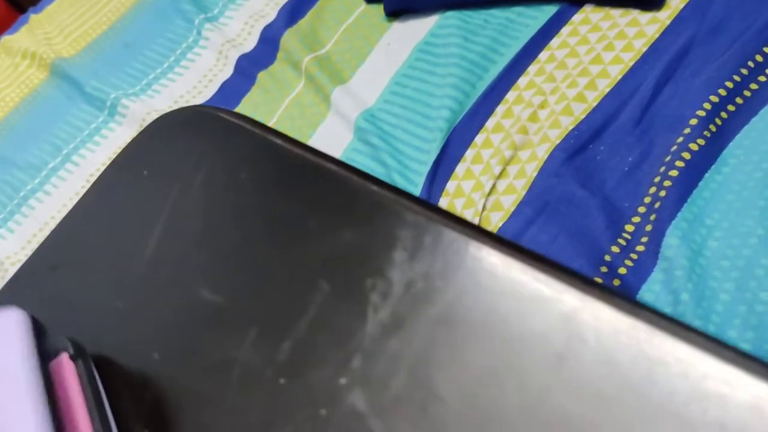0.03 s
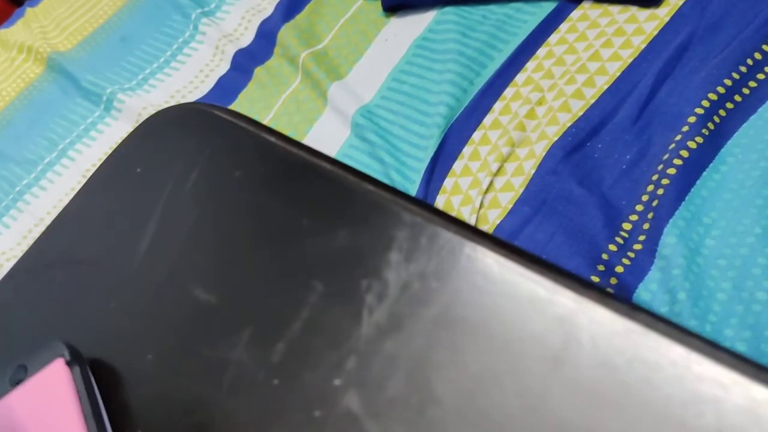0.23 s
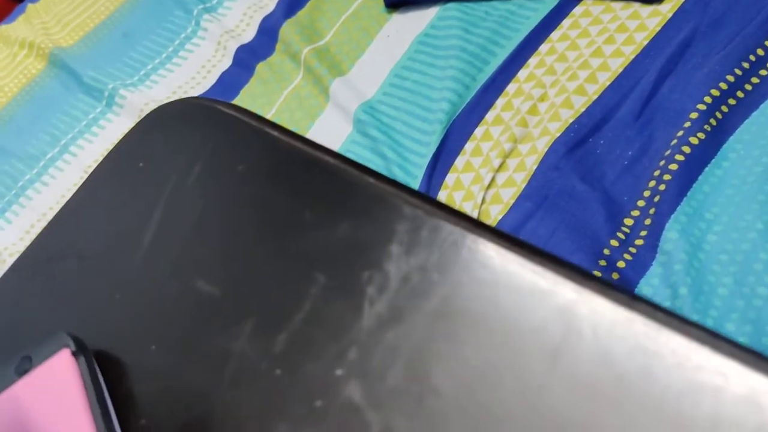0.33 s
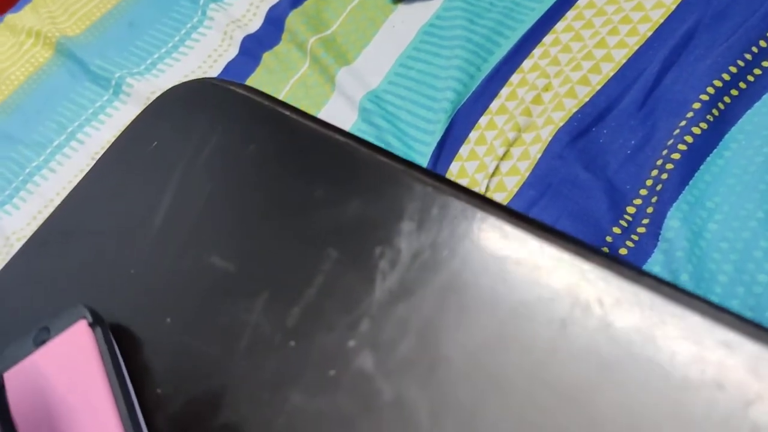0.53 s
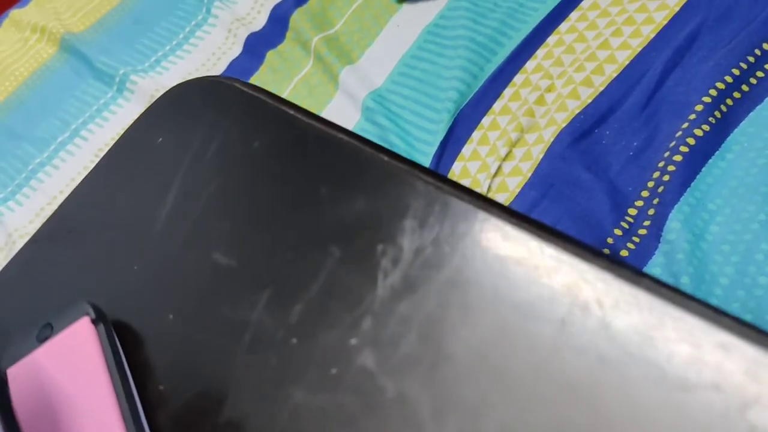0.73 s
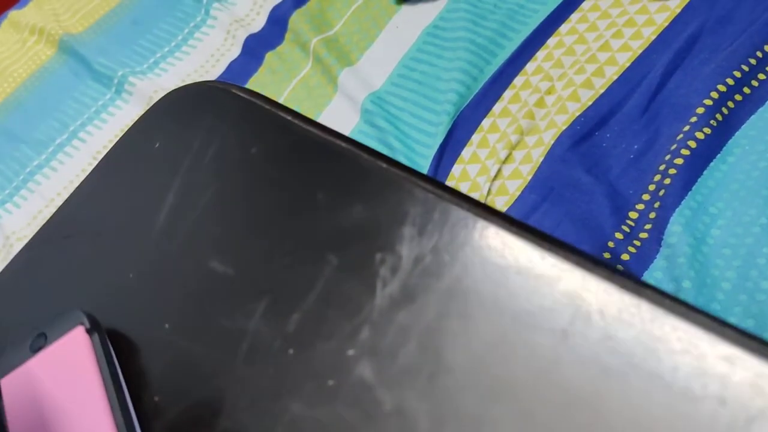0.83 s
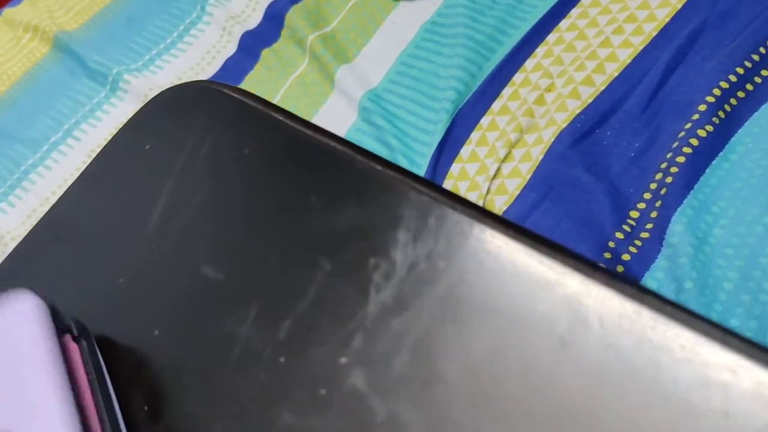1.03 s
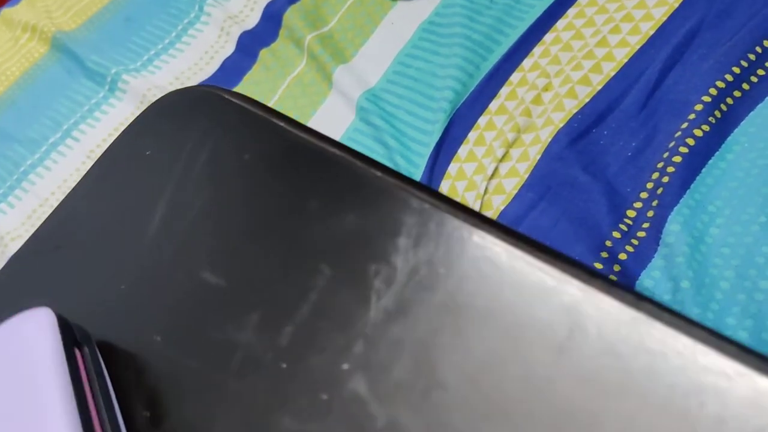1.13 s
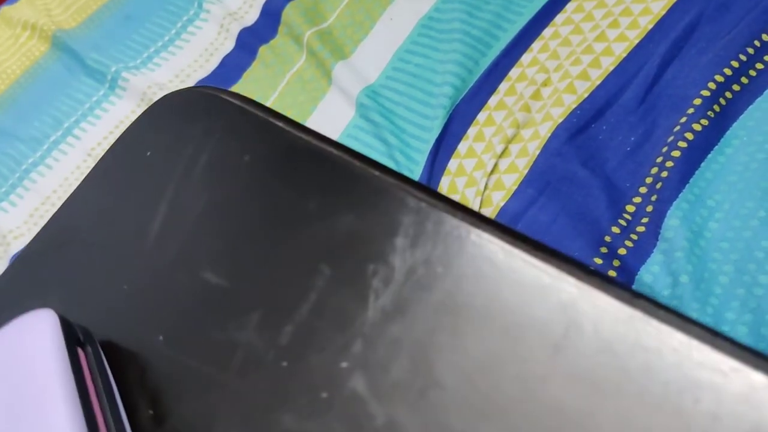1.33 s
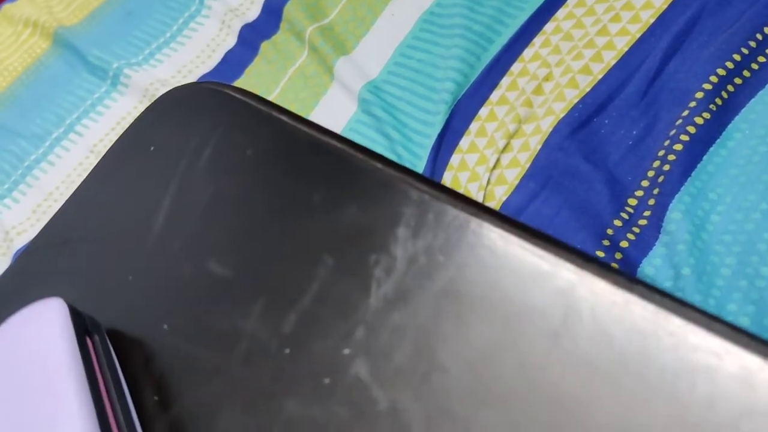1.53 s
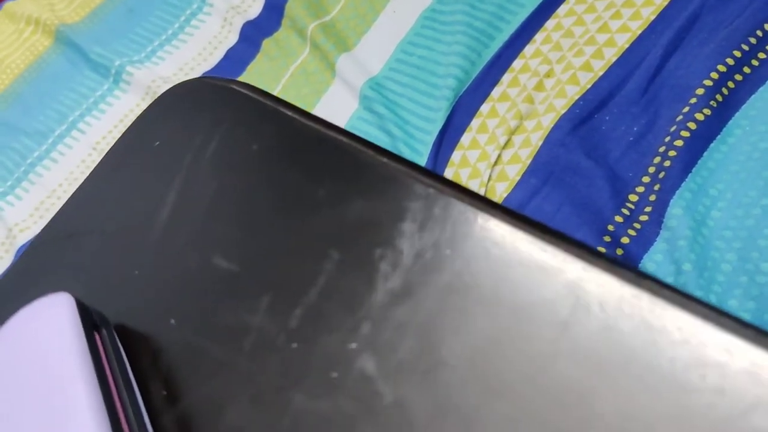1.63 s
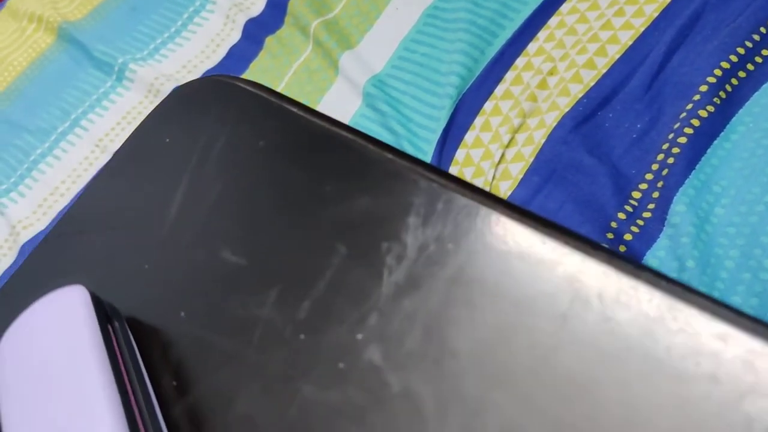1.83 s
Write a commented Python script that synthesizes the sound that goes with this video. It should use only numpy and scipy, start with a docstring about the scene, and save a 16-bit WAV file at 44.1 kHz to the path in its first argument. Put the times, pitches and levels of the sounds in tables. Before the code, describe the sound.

Two sharp plastic clacks come from a hair straightener close to the microphone: first shutting, then springing open. A faint swish of hair falls between them, and light handling rustle follows, over the low hum of a small room.

```python
"""Faint air and a low hum in a small quiet room; then, close to the microphone, a hair straightener
claps shut, swishes along a lock of hair and snaps open. Each clack is a short crack plus the quickly
damped modes of the plastic arms, followed by one near reflection and the room. The casing rubs and
knocks in the hand, and air moved by the hand buffets the microphone."""
import sys
import numpy as np
from scipy import signal
from scipy.fft import rfft, irfft
from scipy.io import wavfile

SR = 44100
rng = np.random.default_rng(int(sys.argv[2]) if len(sys.argv) > 2 else 0)


def transcribe(u):
    """Save the signal u as a 16-bit wav file named by the first command-line argument.

    u: samples, shape (n,) or (channels, n), limited to [-1, 1]; the rate is SR.
    q: integer samples, one column per channel.
    """
    v = np.clip(np.atleast_2d(u).T, -1, 1)
    q = np.round(v * 32767).astype(np.int16)
    wavfile.write(sys.argv[1], SR, q)


N = 83790
T = np.arange(N) / SR
BIN_HZ = np.arange(N // 2 + 1) * SR / N


def from_db(db):
    """Decibels to gain."""
    return 10 ** (np.asarray(db) / 20)


def at_hz(table, hz):
    """Table lookup on a log-frequency axis."""
    table_hz, values = np.transpose(table)
    return np.interp(np.log(np.maximum(hz, 1)), np.log(table_hz), values)


def pan(db):
    """Stereo gains for a left-right level difference."""
    return from_db(np.array([[.5], [-.5]]) * db)


def pan_by_hz(x, pan_table):
    """Frequency-dependent panning."""
    return irfft(rfft(x) * pan(at_hz(pan_table, BIN_HZ)), N)


def decay(t, t60):
    """Silent before t = 0, then an exponential fall."""
    return (t >= 0) * np.exp(-np.log(1000) * np.maximum(t, 0) / t60)


def swells(rows):
    """Summed envelopes, each rising exponentially to a peak, then decaying."""
    return sum(from_db(db) * np.where(T < at, np.exp(2 * np.minimum(T - at, 0) / rise), decay(T - at, t60))
               for at, db, rise, t60 in rows)


def flicker(per_s):
    """Random wander, spread about 1."""
    return np.interp(T * per_s, np.arange(8192), rng.standard_normal(8192))


def delayed(x, delay_s):
    """Stereo delay, N samples out."""
    return np.pad(x, ((0, 0), (int(delay_s * SR), N)))[:, :N]


def butter(x, hz, kind, order):
    """Low- or high-pass."""
    return signal.lfilter(*signal.butter(order, min(hz, .45 * SR), kind, fs=SR), x)


# (frequency [Hz], left-right correlation [0-1])
COHERENCE = [(50, .92), (300, 0.98), (800, 0.18), (2000, 0.033), (15000, .05)]

def noise(spectrum):
    """Coloured stereo noise, rms 1, nearly mono in the bass."""
    alike = np.clip(at_hz(COHERENCE, BIN_HZ), 0, 1)
    mid, side = rfft(rng.standard_normal((2, N)))
    stereo = np.sqrt(1 + alike) * mid + np.sqrt(1 - alike) * side * [[1], [-1]]
    x = irfft(from_db(at_hz(spectrum, BIN_HZ)) * stereo, N)
    return x / x.std()


# (frequency [Hz], relative level [dB])
AIR_SPECTRUM = [(15, -29.5), (25, -9.5), (91, -7.5), (113, -7), (178, -14.5), (260, -17.5), (410, -10.5),
                (582, -16), (666, -19.5), (970, -20), (2170, -24.5), (4150, -33.5), (5010, -29),
                (6550, -41.5), (15500, -46)]
# (frequency [Hz], left-right [dB])
AIR_BALANCE = [(60, -2), (300, 3.5), (1200, 1), (3000, -3.5), (5000, 0), (7500, -10.5), (12000, 2)]
# (time [s], level [dB])
AIR_ENVELOPE = [(0, -51.5), (.6, -53.5), (1.0, -55.5), (1.5, -54), (1.7, -56.5), (1.9, -57)]

def room_air():
    """Faint, bass-heavy room noise."""
    level_db = np.interp(T, *np.transpose(AIR_ENVELOPE))
    return from_db(level_db) * pan_by_hz(noise(AIR_SPECTRUM), AIR_BALANCE)


# (time [s], level [dB])
HUM_ENVELOPE = [(0, -58.5), (.6, -59), (.9, -65), (1.45, -57.5), (1.56, -93), (1.9, -80)]

def hum(hz=89.2):
    """Low tone with wandering phase."""
    level_db = np.interp(T, *np.transpose(HUM_ENVELOPE))
    return from_db(level_db) * np.sqrt(2) * np.sin(2 * np.pi * hz * T + .5 * flicker(per_s=6.1))


# (peak time [s], level [dB], rise [s], t60 [s])
RUB_SWELLS = [(.184, -52, 0.0016, .06), (.195, -54.5, 0.0023, 0.066), (.5, -52, 0.038, 0.41),
              (1.219, -37.5, 0.0022, 0.36), (1.42, -53, 0.36, 0.33), (1.533, -50, 0.068, 0.31)]
# (frequency [Hz], relative level [dB])
RUB_SPECTRUM = [(150, -1), (500, 0), (1900, -5.5), (2350, 4), (3000, -6), (3500, 0.5), (4150, -15.5),
                (5050, 1.5), (6200, -13.5), (7300, -8), (10000, -19.5), (15500, -21)]

def casing_rub(grain_db=1):
    """Grainy friction of the casing in the hand."""
    grain = from_db(grain_db * flicker(per_s=1100))
    return pan(db=-1.5) * swells(RUB_SWELLS) * grain * noise(RUB_SPECTRUM)


# (frequency [Hz], gain [dB])
ROOM_SPECTRUM = [(100, -6), (270, -3), (550, 1), (950, -3), (1500, 1.8), (2600, -1), (5000, 0.44),
                 (7500, -1), (14000, -4)]
# (frequency [Hz], t60 [s])
ROOM_DECAY = [(100, 0.59), (300, 0.55), (1200, 0.42), (5000, 0.46), (14000, 0.5)]

def room_response(early_db=-3.5, early_t60_s=.13, onset_s=.005):
    """Dense early reflections and a tail that dies band by band."""
    wash = rfft(noise([(1, .0028), (2, .016)])) * from_db(at_hz(ROOM_SPECTRUM, BIN_HZ))
    centres_hz = np.geomspace(100, 14000, 8)
    out = 0
    for hz, weights in zip(centres_hz, np.eye(len(centres_hz))):
        band = irfft(wash * at_hz(np.c_[centres_hz, weights], BIN_HZ), N)
        fall = decay(T, at_hz(ROOM_DECAY, hz)) + from_db(early_db) * decay(T, early_t60_s)
        fall *= np.minimum(T / onset_s, 1) ** 2
        out += band * fall / np.sqrt(np.sum(fall ** 2))
    return out


# (frequency [Hz], t60 [s], shutting gain [dB], opening gain [dB], left-right [dB])
ARM_MODES = [(242.9, 0.064, -15.5, -24, 12), (292, 0.056, -13, -27, 0), (492, 0.017, -16, -41, 18),
             (710.5, 0.063, -35, -27.5, 3.5), (986, 0.019, -11.5, -22, 1.5),
             (1810, 0.0067, -32.5, -21.5, 32.5), (2294, 0.026, -18.5, -18, 16), (2548, 0.012, -15, -4, 7.5),
             (2796, 0.014, -17.5, -19.5, -22.5), (3494, 0.0056, -24, -1, 1),
             (5100, 0.0087, -9.5, -11.5, -2), (5500, .008, -25, -34, -25.5),
             (7096, 0.0074, -20.5, -7, -21.5), (8070, .005, -18, -37.5, 3.5)]

def clacks(blows, crack_spectrum, crack_balance, echo_s, opening, right_lag_s=.00024, room_gap_s=.003):
    """Blows crack and ring the slim arms, which radiate little bass; softer contact is duller."""
    out, room = np.zeros((2, N)), room_response()
    t = T[:SR // 8] - np.array([[0], [right_lag_s]])
    ring = 0
    for k, (hz, t60, shut_db, open_db, pan_db) in enumerate(ARM_MODES):
        polarity = (-1) ** (k // 2 + 1)
        gain = from_db(open_db if opening else shut_db) * pan(pan_db)
        ring += polarity * gain * decay(t, t60) * np.sin(2 * np.pi * hz * t)
    for at, db, contact_hz, echo_db, room_db, crack_db, crack_t60 in blows:
        burst = pan_by_hz(noise(crack_spectrum), crack_balance)[:, :t.shape[1]]
        crack = from_db(crack_db) * decay(t, crack_t60) * burst
        radiated = np.array([crack + ring, crack + from_db(-1) * ring])
        softened = butter(radiated, contact_hz, "low", order=2)
        direct, room_send = from_db(db) * butter(softened, hz=199, kind="high", order=3)
        echo = from_db(echo_db) * butter(direct, hz=1400, kind="low", order=1)  # near surface
        tail = from_db(room_db) * signal.fftconvolve(room_send, room, axes=1)
        out += delayed(direct, at) + delayed(echo, at + echo_s) + delayed(tail, at + room_gap_s)
    return out


# (time [s], gain [dB], contact cut-off [Hz], echo [dB], room [dB], crack [dB], crack t60 [s])
SHUT_BLOWS = [(.2054, -19.5, 3730, -9, -3.5, 0.5, 0.036), (.2115, -27, 4550, -16, -6.5, 2, 0.031),
              (.2544, -1, 14600, -7.5, -7, -7.5, 0.019)]
# crack: (frequency [Hz], relative level [dB])
SHUT_SPECTRUM = [(100, -7.5), (380, -3.5), (620, 5), (950, 2.5), (1350, -3.5), (1900, -2), (3200, 3),
                 (4200, -6), (5200, 1.5), (6200, -11), (7300, -9), (10000, -12), (15500, -19.5)]
# crack: (frequency [Hz], left-right [dB])
SHUT_BALANCE = [(300, 4), (1200, -2), (2500, -2.5), (5000, 1), (7500, -5.5), (13000, -5.5)]

def clap_shut():
    """The plates meet."""
    return clacks(SHUT_BLOWS, SHUT_SPECTRUM, SHUT_BALANCE, echo_s=.0074, opening=False)


# (time [s], level [dB], pitch [Hz], t60 [s])
HANDLE_KNOCKS = [(.2054, -25.5, 173, 0.033), (.247, -32.5, 266, 0.075), (1.1319, -27.5, 130, 0.016),
                 (1.144, -26.5, 253.5, 0.03), (1.146, -28.5, 679, .06), (1.492, -44.5, 259.2, 0.069)]

def handle_knocks():
    """Dull knocks of the handle, one damped mode each."""
    knocks = sum(-from_db(db) * decay(T - at, t60) * np.sin(2 * np.pi * hz * (T - at))
                 for at, db, hz, t60 in HANDLE_KNOCKS)
    return pan(db=7) * butter(knocks, hz=108, kind="high", order=2)


# (peak time [s], level [dB], rise [s], t60 [s])
PUFF_SWELLS = [(.34, -50.5, .03, 0.85), (1.28, -51, 0.032, 0.46), (1.381, -61, .03, .4)]
# (frequency [Hz], relative level [dB])
PUFF_SPECTRUM = [(20, -0.5), (45, -10.5), (100, -16), (200, -33.5), (1000, -61)]

def air_puffs():
    """Air moved by the hand buffets the microphone."""
    return swells(PUFF_SWELLS) * noise(PUFF_SPECTRUM)


# (time [s], level [dB], rise [s], hold [s], release [s])
HAIR_STROKES = [(0.688, -69.5, 0.026, 0.065, 0.031), (0.88, -58, 0.019, 0.024, 0.11),
                (1.024, -61, 0.1, 0.061, 0.026), (1.336, -64.5, 0.04, 0.057, 0.044),
                (1.494, -58, 0.023, 0.011, 0.042)]
# (frequency [Hz], relative level [dB])
HAIR_SPECTRUM = [(1500, -15), (4200, -7.5), (5300, 11), (6300, -3), (8000, 1), (10500, -2), (15500, -8.5)]

def hair_swish(grain_db=2):
    """Fine, bright friction of hair on the plates."""
    strokes = sum(from_db(db) * np.interp(T, at + np.cumsum([0, rise, hold, release]), [0, 1, 1, 0])
                  for at, db, rise, hold, release in HAIR_STROKES)
    grain = from_db(grain_db * flicker(per_s=1200))
    return pan(db=-7.5) * strokes * grain * noise(HAIR_SPECTRUM)


# (time [s], gain [dB], contact cut-off [Hz], echo [dB], room [dB], crack [dB], crack t60 [s])
OPEN_BLOWS = [(1.1247, -37.5, 3000, -16, 16.5, 6, 0.018), (1.1319, -4.5, 18080, -17, -14.5, -2, 0.0075),
              (1.1505, -24, 4500, -0.5, -4.5, -1.5, 0.028)]
# crack: (frequency [Hz], relative level [dB])
OPEN_SPECTRUM = [(100, -5.5), (350, 3), (750, 4.5), (1500, -7), (2600, 6.5), (3500, -2), (4200, -8.5),
                 (5200, 7.5), (6200, -5.5), (7500, 6.5), (10000, -9), (15500, -8.5)]
# crack: (frequency [Hz], left-right [dB])
OPEN_BALANCE = [(300, 6), (1200, 1), (2500, 5.5), (5000, -5.5), (7500, -5), (13000, 1)]

def snap_open():
    """The arms spring against their stop."""
    return clacks(OPEN_BLOWS, OPEN_SPECTRUM, OPEN_BALANCE, echo_s=.0147, opening=True)


def scene():
    """Stereo sum of all sources."""
    plates = clap_shut() + snap_open()
    handling = casing_rub() + handle_knocks() + air_puffs()
    return plates + handling + hair_swish() + room_air() + hum()


def record(dry, ceiling=.85, cutoff_hz=16300):
    """Soft clip, then steep low-pass."""
    rounded = ceiling * np.tanh(dry / ceiling)
    return signal.sosfilt(signal.ellip(10, .05, 70, cutoff_hz, fs=SR, output="sos"), rounded)


dry = scene()
out = record(dry)
transcribe(out)
```